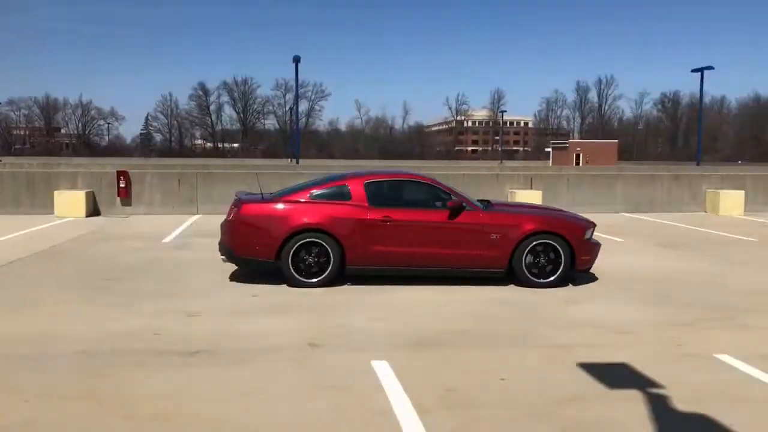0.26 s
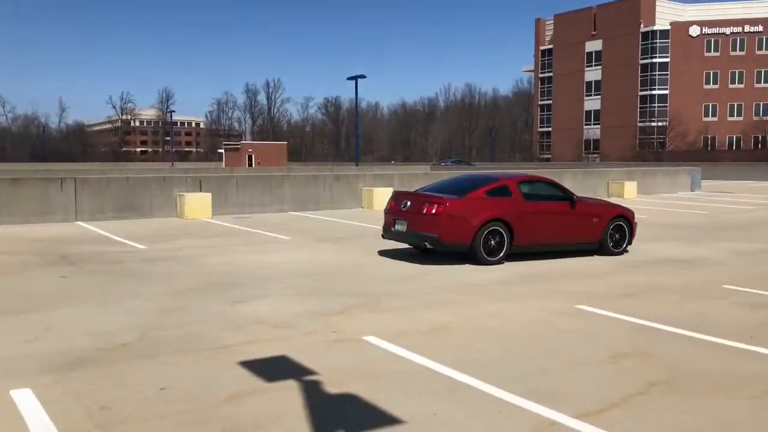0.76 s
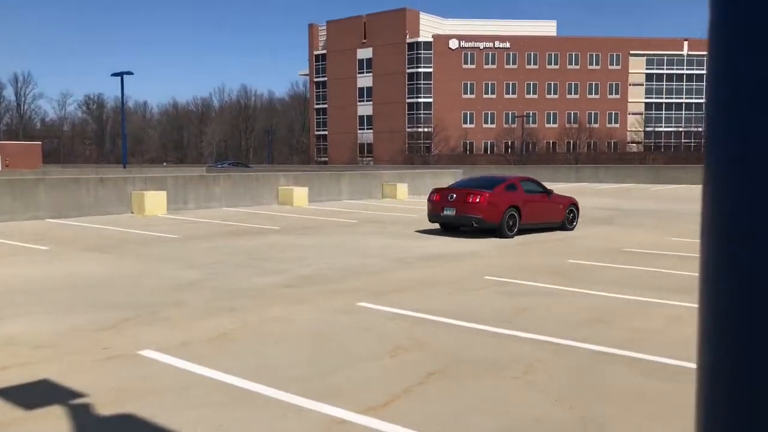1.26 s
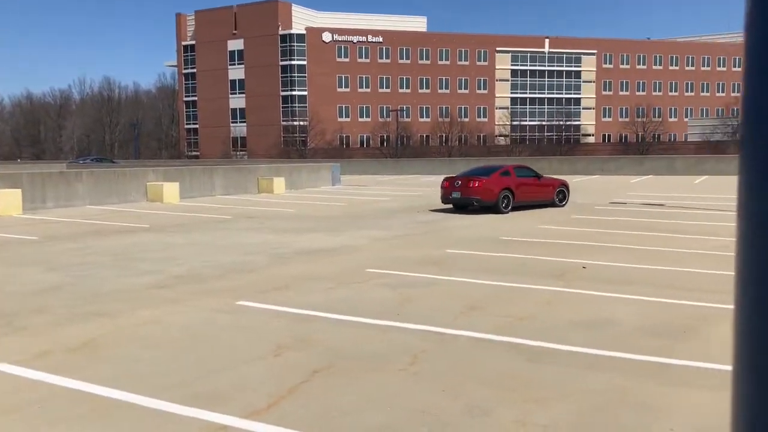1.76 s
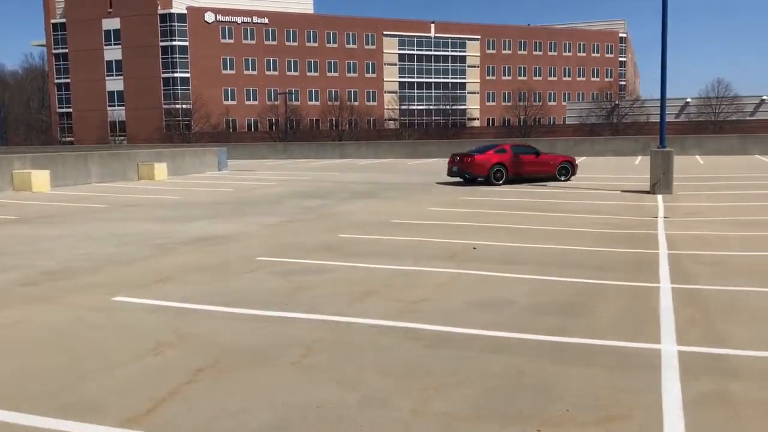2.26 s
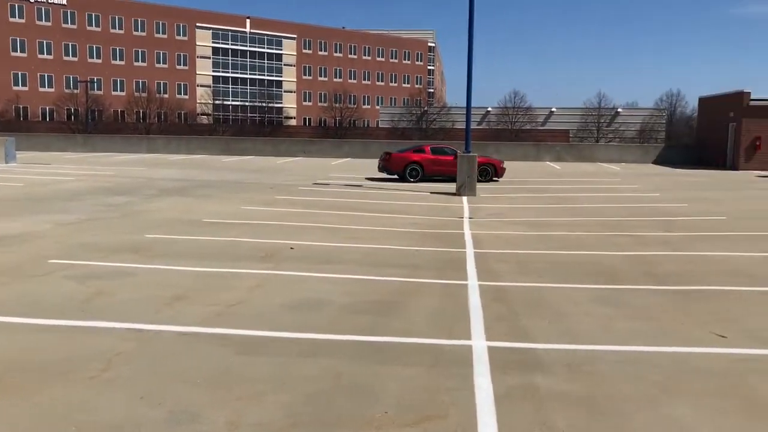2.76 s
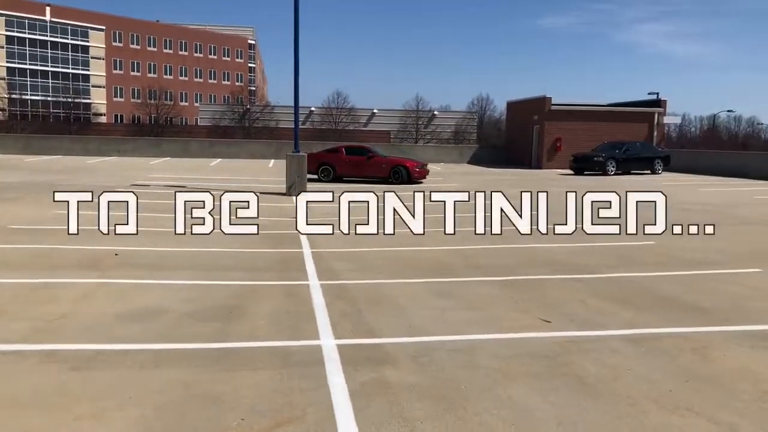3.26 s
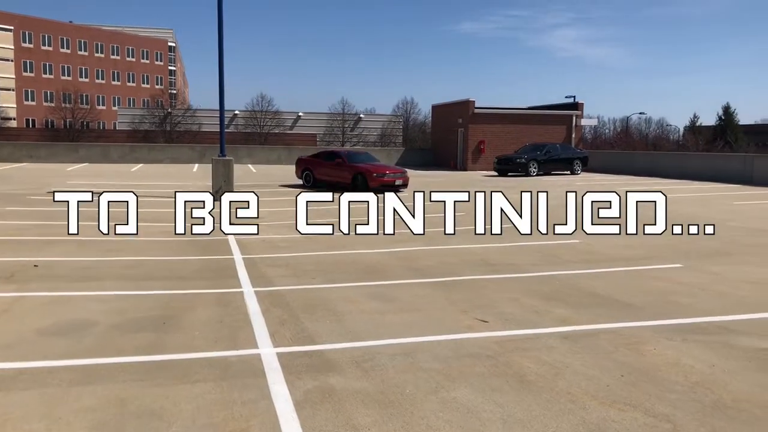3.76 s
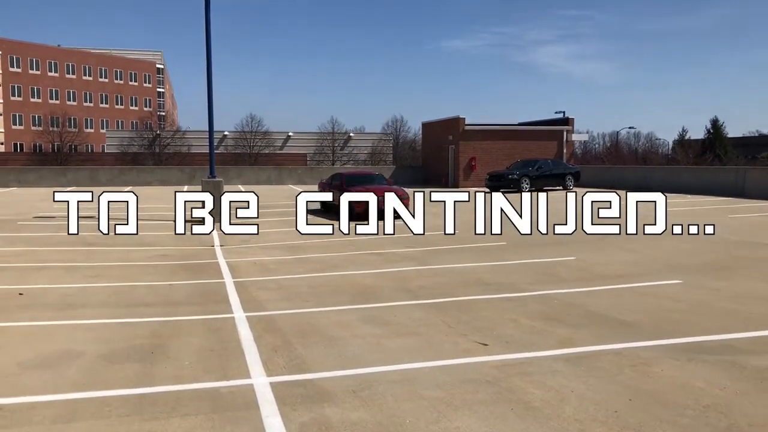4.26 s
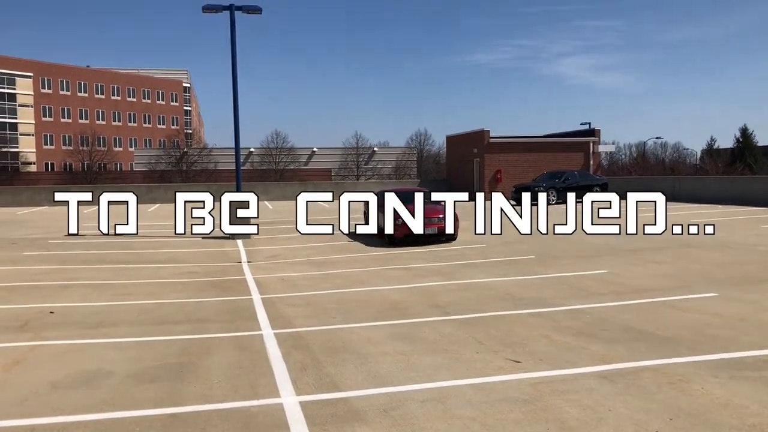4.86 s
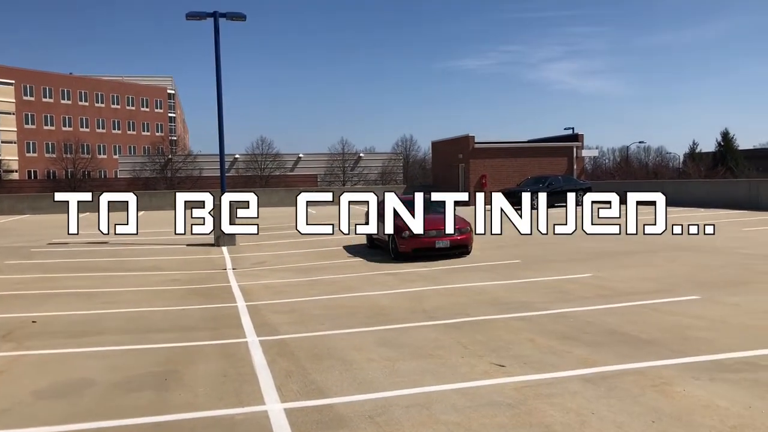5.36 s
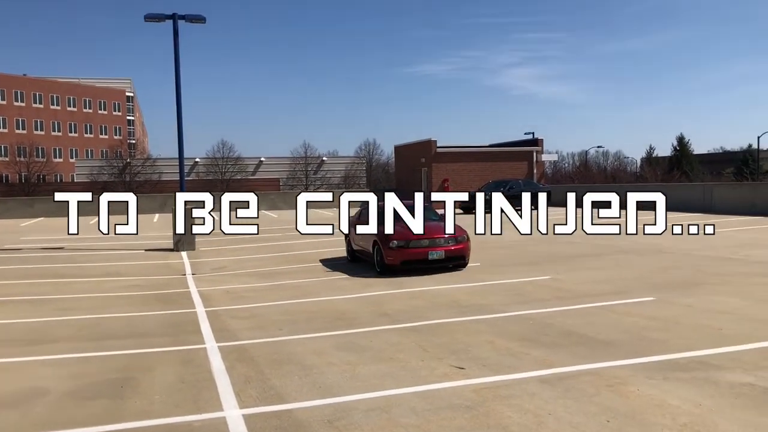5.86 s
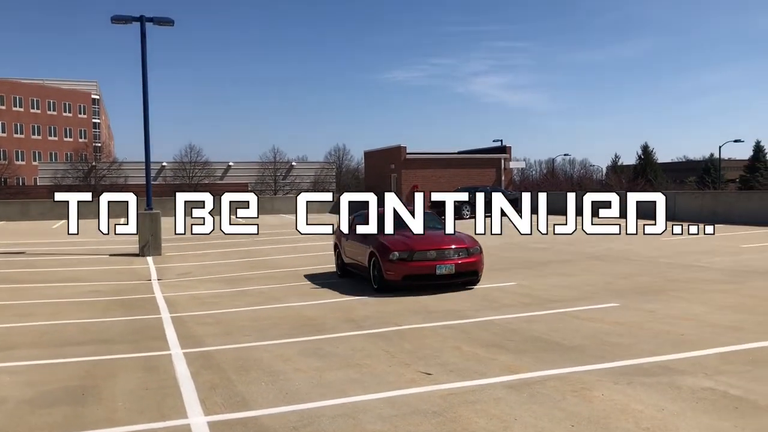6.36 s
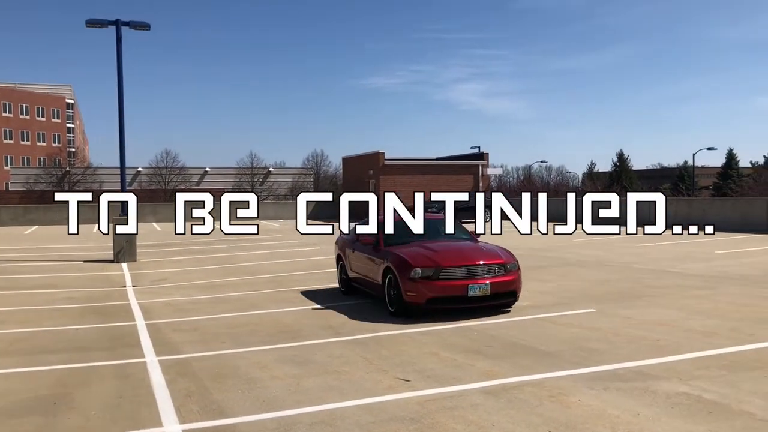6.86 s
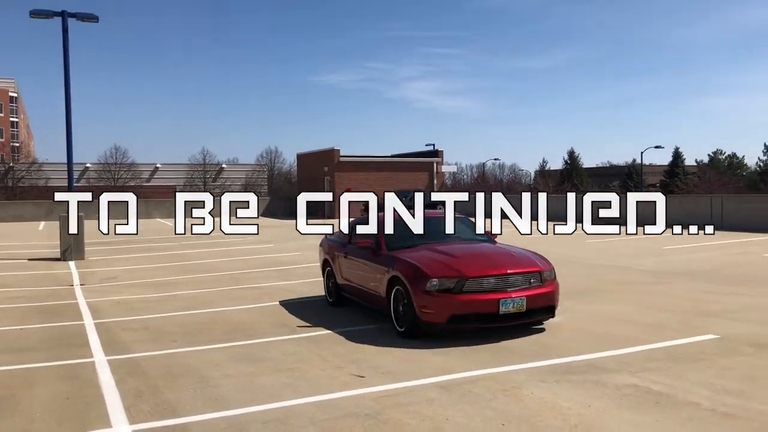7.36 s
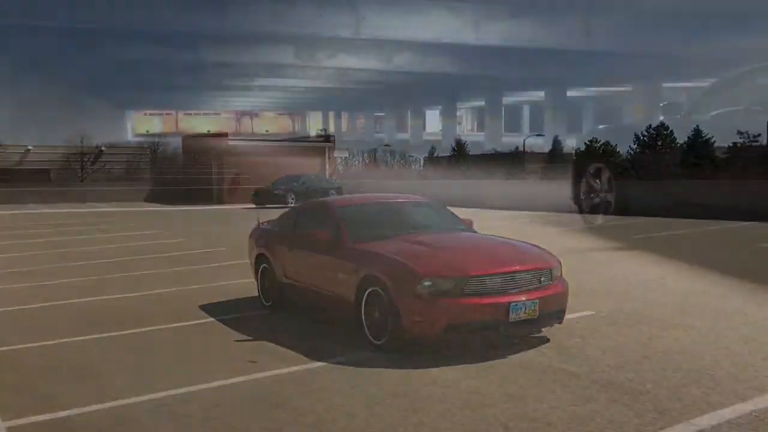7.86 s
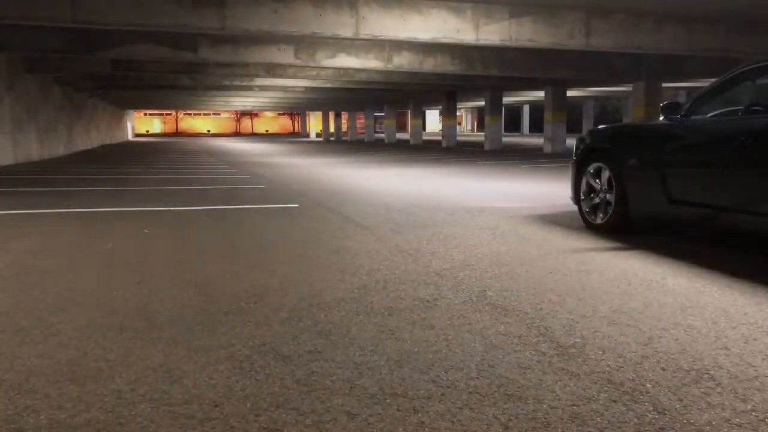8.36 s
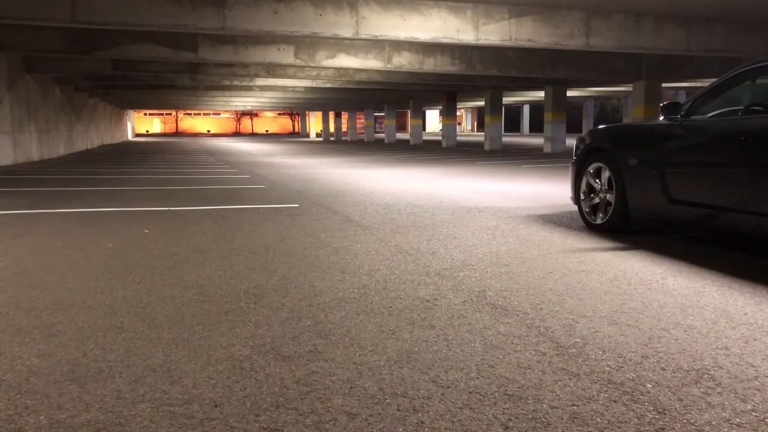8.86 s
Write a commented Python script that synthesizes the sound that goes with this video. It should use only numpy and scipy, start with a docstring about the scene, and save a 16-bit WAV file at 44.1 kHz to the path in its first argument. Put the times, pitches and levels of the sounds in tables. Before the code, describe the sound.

On an open concrete parking deck, a powerful car passes and coasts away, its exhaust tone falling into rough burbles. Tyres squeal through a bend for over two seconds, echoing off distant walls, and end in chirps. Quiet hiss, small ticks and low wind thuds on the microphone follow. Abruptly, a deep lumpy engine idle resonates in a low concrete garage.

```python
"""An eight-cylinder car coasts away across an open concrete parking deck: exhaust tones over rough firings, puffs
in the pipes. It slides round a bend on squealing tyres: tones that stick and slip, with slap echoes off the walls.
It rolls back quietly, a slowly growing hiss, while ticks sound and wind bumps the microphone as falling thuds.
At the end an engine idles in a low concrete garage: lumpy pulses ring the pipes and the room, under whine and hiss.
Roar and hiss lie under it all, louder at first."""
import sys
import numpy as np
from scipy import signal
from scipy.fft import rfft, irfft, next_fast_len
from scipy.io import wavfile
from scipy.ndimage import uniform_filter1d

SR = 44100
rng = np.random.default_rng(int(sys.argv[2]) if len(sys.argv) > 2 else 0)


def master_out(mix):
    """Clip the mix to full scale and print it as 16-bit PCM to the path in sys.argv[1]."""
    frames = np.transpose(np.atleast_2d(mix))
    ceiling = np.clip(frames, -1, 1)
    pcm = np.round(ceiling * 32767).astype(np.int16)
    wavfile.write(sys.argv[1], SR, pcm)


def elevation(decibels):
    """Turn decibel levels (scalar or array-like) into linear amplitude ratios."""
    levels = np.asarray(decibels, float)
    return 10 ** (levels / 20)


N = 401310
T = np.arange(N) / SR
GARAGE_S = 7.56  # the open deck ends, the garage begins


def unit(x):
    """Scale to rms 1."""
    return x / np.sqrt(np.mean(x ** 2))


def noise():
    """White noise of rms 1."""
    return rng.standard_normal(N)


def span(start_s, stop_s, edge_s=0.039):
    """A gate open from start to stop, with linear ramps just outside."""
    return np.clip(np.minimum(T - start_s, stop_s - T) / edge_s + 1, 0, 1)


def columns(table):
    """Each column of a curve at every sample, and a gate that is open while the curve lasts."""
    s, *cols = np.transpose(table)
    return [np.interp(T, s, c) for c in cols] + [span(s[0], s[-1])]


def walk(rate_hz):
    """Smooth random wander, about rate_hz turns a second, spread 1."""
    k = int(SR / rate_hz)
    held = np.repeat(rng.standard_normal(N // k + 1), k)
    return unit(uniform_filter1d(held, k)[:N])


def steps(rate_hz, slide_samples=60):
    """Random values held for uneven spells, about rate_hz a second, sliding from one to the next."""
    spell = np.cumsum(rng.random(N) < rate_hz / SR)
    return uniform_filter1d(noise()[spell], slide_samples)


def shaped(x, gain):
    """Filter by a gain given as a function of frequency."""
    size = next_fast_len(N)
    hz = np.arange(1, size // 2 + 2) * SR / size
    return irfft(rfft(x, size) * gain(hz), size)[:N]


def colour(points):
    """Noise of rms 1 with a spectrum drawn through (Hz, dB) points."""
    hz, db = np.transpose(points)
    return unit(shaped(noise(), lambda f: elevation(np.interp(np.log(f), np.log(hz), db))))


def resonate(x, peaks):
    """Sound through a set of steep (Hz, width in Hz, dB) resonances, scaled to rms 1."""
    def gain(f):
        return sum(elevation(db) / (1 + 1j * (f / hz - hz / f) * hz / width) ** 2 for hz, width, db in peaks)
    return unit(shaped(x, gain))


def tail(x, t60_s):
    """Diffuse reverberation: convolution with decaying noise of unit energy."""
    t = T[:int(t60_s * SR)]
    h = rng.standard_normal(len(t)) * elevation(-60 * t / t60_s)
    return signal.fftconvolve(x, h / np.sqrt(np.sum(h ** 2)))[:N]


def ground(x):
    """The bounce off the slab partly cancels a narrow band."""
    return shaped(x, lambda f: 1 - 0.54 * np.exp(-((f - 440) / 35) ** 2))


# Walls round the deck. Each row: delay in seconds, level in dB ahead of the smearing.
WALL_ECHOES = [(.065, -23), (.1, -23), (0.137, -25), (.175, -29), (.27, -31), (.4, -43.5), (.52, -41)]
DECK_T60_S, DECK_DB = 1.2, -21


def deck(x):
    """Dull, slightly smeared slap echoes from distant walls and a thin, duller diffuse tail."""
    dull = shaped(x, lambda f: .6 + 1 / (1 + (f / 1500) ** 6))
    duller = shaped(dull, lambda f: 1.2 / (1 + (f / 1900) ** 6))
    echoes = sum(elevation(db) * np.interp(T - delay_s, T, dull) for delay_s, db in WALL_ECHOES)
    return x + tail(echoes, .05) + elevation(DECK_DB) * tail(duller, DECK_T60_S)


# Faint tones. Each row: pitch in Hz, width in Hz, level in dB re HUM_DB.
HUM_TONES = [(392, 30, 0), (1310, 40, -2)]
HUM_DB = -65


def hum():
    """Narrow bands of noise that come and go under the open-air floor."""
    out = np.zeros(N)
    for peak in HUM_TONES:
        out += elevation(HUM_DB + peak[2] + 4.0 * walk(3)) * resonate(noise(), [peak])
    return out * span(0, GARAGE_S)


# Rumble, roar and hiss that are louder at first. Each row: time in seconds, level in dB ahead of layer offsets.
LOUDER_STRETCH = [(0, -32), (.5, -31), (1.16, -38.5), (1.9, -37.5), (2.5, -39), (3.5, -36.5), (4.14, -41)]
# Spectra of the three layers. Each row: frequency in Hz, relative density in dB.
RUMBLE_SPECTRUM = [(15, -22), (25, -22.5), (48, 2.5), (81, 1.5), (124, 2.5), (286, -17.5), (400, -12),
                   (520, -55.5), (880, -120)]
ROAR_SPECTRUM = [(120, -15.5), (200, 2.5), (288, -1), (392, 1.5), (449, -0.5), (857, -0.5), (1490, -4.5),
                 (2730, -23), (4310, -44), (5000, -53.5), (6500, -47), (11000, -120)]
HISS_SPECTRUM = [(1180, -8), (2000, -1.5), (2680, -9), (4060, -5.5), (5450, -14), (8260, -17.5),
                 (10100, -25.5), (15100, -29.5), (15800, -34)]
LOUDER_RUMBLE_DB, LOUDER_ROAR_DB, LOUDER_HISS_DB = -8.5, 0.5, -7.5
RUMBLE_FADE_DB_PER_S, ROAR_FADE_DB_PER_S = -3.5, -3.5  # the lower layers thin out faster than the hiss
FLOOR_RUMBLE_DB, FLOOR_ROAR_DB, FLOOR_HISS_DB = -49, -50, -61
GUST_DB = 2.2  # rms spread of the rumble's swells
GARAGE_ROAR_DB = 2  # the closed room raises the roar floor
RETURN_S, RETURN_DB_PER_S = 6.2, 1.5  # the hiss floor grows as the car rolls back
NEAR_HISS_DB, NEAR_FADE_DB_PER_S = -53.5, -10  # bright tyre hiss while the car is close


def background():
    """Gusty rumble in the open air only, flickering roar and hiss, with a louder stretch that ends over a floor."""
    db, gate = columns(LOUDER_STRETCH)
    flicker = walk(11)
    low = elevation(db + LOUDER_RUMBLE_DB + RUMBLE_FADE_DB_PER_S * T) * gate + elevation(FLOOR_RUMBLE_DB)
    rumble = low * elevation(GUST_DB * walk(7)) * colour(RUMBLE_SPECTRUM) * span(0, GARAGE_S)
    mid_floor = elevation(FLOOR_ROAR_DB + GARAGE_ROAR_DB * span(GARAGE_S, T[-1]))
    mid = elevation(db + LOUDER_ROAR_DB + ROAR_FADE_DB_PER_S * T) * gate + mid_floor
    roar = mid * elevation(.6 * flicker) * colour(ROAR_SPECTRUM)
    nearing_db = RETURN_DB_PER_S * np.clip(T - RETURN_S, 0, GARAGE_S - RETURN_S)
    high = elevation(db + LOUDER_HISS_DB) * gate + elevation(FLOOR_HISS_DB + nearing_db)
    hiss = high * elevation(1.1 * flicker + 0.6 * steps(14, 1500)) * colour(HISS_SPECTRUM)
    near = elevation(NEAR_HISS_DB + NEAR_FADE_DB_PER_S * T) * resonate(noise(), [(12000, 14000, 0)])
    return near + rumble + roar + hiss


# Small sharp ticks. Each row: start in seconds, peak in dB, centre in Hz.
TICKS = [(4.637, -56, 11500), (4.998, -49, 12500), (5.285, -42, 5500), (5.86, -34, 5160),
         (6.599, -42.5, 5500), (7.204, -45, 5000), (7.408, -45, 6000), (7.487, -40, 7000),
         (7.561, -35, 4500), (8.487, -41, 6000)]
TICK_DECAY_S = .001


def ticks():
    """Bright clicks a millisecond or two long: decaying noise, each in its own band."""
    out, t = np.zeros(N), T[:400]
    for s, db, hz in TICKS:
        burst = np.exp(-t / TICK_DECAY_S) * rng.standard_normal(400)
        edges_hz = [hz / 1.5, min(hz * 1.6, 19000)]
        band = signal.sosfilt(signal.butter(2, edges_hz, "band", fs=SR, output="sos"), burst)
        i = int(s * SR)
        out[i:i + 400] += elevation(db) * band / np.abs(band).max()
    return out


# Wind bumps. Each row: start in seconds, level in dB, nominal pitch in Hz.
BUMPS = [(4.954, -35, 130), (5.195, -36, 150), (5.322, -33, 87), (5.58, -40, 119), (6.111, -40.5, 193),
         (6.234, -33.5, 106), (6.273, -19, 189), (6.369, -32.5, 175), (6.815, -32.5, 104),
         (6.997, -37, 117), (7.248, -41, 143), (7.298, -38, 90)]
BUMP_T60_S, CHURN_T60_S, CHURN_DB = 0.12, 0.45, -16.5


def bumps():
    """Each gust: a thud that drops in pitch, a burst of turbulence and a slap that grows as the level squared."""
    out, churn = np.zeros(N), colour([(40, -1), (120, 3.0), (400, -6.5), (1200, -28), (4000, -86)])
    t = T[:SR // 2]
    rise = np.minimum(t / 0.0042, 1)
    for s, db, hz in BUMPS:
        i = int(s * SR)
        turbulence = churn[i:i + len(t)]
        pitch_hz = hz * (0.888 + 1.32 * np.exp(-t / 0.00616))
        tone = np.sin(2 * np.pi * np.cumsum(pitch_hz) / SR)
        thud = elevation(-60 * t / BUMP_T60_S) * (tone + 0.67 * turbulence)
        after = elevation(CHURN_DB - 60 * t / CHURN_T60_S) * turbulence
        slap = elevation(db + 17.5) * np.exp(-((t - .0095) / 0.0011) ** 2) * np.sin(2 * np.pi * 750 * t)
        out[i:i + len(t)] += elevation(db) * (rise * (thud + after) + slap)
    return out


# Strength of the eight pulses in firing order, in dB.
CYLINDER_DB = [-9.5, -25, -1, -16, -4.5, -2.5, -9, 1.5]


def firings(hz, jitter, scatter_db, lumpy=1):
    """One pulse a cylinder, uneven in timing and strength."""
    turn = np.floor(np.cumsum(hz * (1 + jitter * walk(40))) / SR).astype(int)
    at = np.flatnonzero(np.diff(turn))
    cylinder_db = lumpy * np.take(CYLINDER_DB, turn[at], mode="wrap")
    pulses = np.zeros(N)
    pulses[at] = elevation(cylinder_db + scatter_db * rng.standard_normal(len(at)))
    return pulses


# Pipe resonances at idle. Each row: centre in Hz, width in Hz, relative level in dB.
IDLE_PIPE = [(49, 23, -10), (61.8, 16, 9), (96.9, 34.5, 0), (117.5, 31, 6.5), (144.7, 9.9, 0.5),
             (158.5, 16, -7), (248, 13, -3.5), (281, 11, -3.5), (320.4, 11, -8), (350, 12.5, -5),
             (375, 6.9, -9), (468, 6.2, -14), (567, 28, -11), (130, 300, -13)]
# Belts and fan. Each row: centre in Hz, width in Hz, relative level in dB.
BELT_WHINE = [(2740, 380, -8), (3010, 500, -12)]
IDLE_HZ, IDLE_DB, IDLE_HISS_DB = 50, -34, -60  # firing rate; levels before the swells below
GARAGE_T60_S, GARAGE_DB = .9, -2
SURGE_DB, SURGE_S, THROB_DB = 3, 0.19, 0.9  # the idle starts strong and throbs unevenly
SWELL_S, SWELL_WIDTH_S, SWELL_DB, SWELL_HISS_DB = 8.28, .2, 2.5, 4  # the idle swells once
SETTLE_S, SETTLE_DB = .15, 2.5  # the hiss is louder at first
HISS_DROPS_S, HISS_DROP_DB = 8.565, -8


def garage():
    """Lumpy idle firings ring the pipes and fill the concrete room; belts and fan whine, with a hiss that drops."""
    swell = np.exp(-((T - SWELL_S) / SWELL_WIDTH_S) ** 2)
    surge = np.exp(-((T - GARAGE_S) / SURGE_S) ** 2)
    pipes = resonate(firings(IDLE_HZ, jitter=.05, scatter_db=2.5, lumpy=.9), IDLE_PIPE)
    room = unit(pipes + elevation(GARAGE_DB) * tail(pipes, GARAGE_T60_S))
    whine = elevation(-28.0 + 0.45 * walk(13.0) + 3.5 * walk(60)) * resonate(noise(), BELT_WHINE)
    engine_db = IDLE_DB + SURGE_DB * surge + SWELL_DB * swell + THROB_DB * walk(22)
    first_db = SETTLE_DB * np.exp(-np.abs(T - GARAGE_S) / SETTLE_S)
    hiss_db = IDLE_HISS_DB + first_db + SWELL_HISS_DB * swell + HISS_DROP_DB * span(HISS_DROPS_S, T[-1])
    hiss = elevation(hiss_db) * resonate(noise(), [(5550, 8200, -1.5), (13100, 9000, -15.0)])
    return span(GARAGE_S, T[-1], .004) * (elevation(engine_db) * (room + whine) + hiss)


# Exhaust burps off throttle. Each row: centre in seconds, level in dB, pitch in Hz.
BURPS = [(.74, -30.5, 360), (0.871, -28, 307), (.93, -30, 245), (1.0, -29.5, 383), (1.06, -31, 302),
         (1.239, -29, 170), (1.38, -30, 130), (1.65, -30, 90), (1.841, -35, 102), (1.91, -38.5, 169.4),
         (2.01, -32.5, 350), (2.09, -32, 170), (2.19, -32, 130)]
BURP_CYCLES, BURP_SHORTEST_S = 4.84, 0.022  # twice the envelope width; least envelope width


def burps():
    """Late burning in the pipes: soft rough puffs of a few cycles."""
    out, rasp = np.zeros(N), walk(250)
    for s, db, hz in BURPS:
        width_s = max(BURP_CYCLES / hz / 2, BURP_SHORTEST_S)
        puff = elevation(db + 2.5 * rasp) * np.exp(-((T - s) / width_s) ** 2)
        out += puff * np.sin(2 * np.pi * hz * (T - s) + 0.86 * rasp[::-1])
    return out


# Engine slowing off throttle. Each row: time in seconds, firing rate in Hz.
COAST = [(0, 258.5), (.85, 203.2), (1.6, 125.9), (2.4, 94.7)]
# Exhaust tones. Each row: multiple of the firing rate, level in dB re the tone level.
EXHAUST_ORDERS = [(0.377, -16), (0.629, -12), (0.749, -7), (0.999, 3.5), (1.374, -9), (2.0, -23),
                  (2.749, -19.5)]
# Pipe resonances. Each row: centre in Hz, width in Hz, relative level in dB.
EXHAUST_PIPE = [(84, 37, 2), (167, 154, 9.5), (369.6, 26, 7), (588, 164, 4)]
TONE_DB, TURNS_AWAY_S, TONE_FADE_DB_PER_S2 = -28.5, 0.42, -75  # tones die once the tailpipes point elsewhere
BURBLE_DB, BURBLE_SWELL_S, BURBLE_RISE_DB_PER_S, BURBLE_FADE_DB_PER_S = -38.5, 0.8, 34, -11
BURBLE_SCATTER_DB = 3.5


def coasting():
    """Clean exhaust tones that fade as the car turns away, over rough firings in the pipes."""
    hz, gate = columns(COAST)
    phase = 2 * np.pi * np.cumsum(hz) / SR
    tones = sum(elevation(db + 1.2 * walk(6)) * np.sin(k * phase + 9 * k * k) for k, db in EXHAUST_ORDERS)
    tone_db = TONE_DB + TONE_FADE_DB_PER_S2 * np.maximum(T - TURNS_AWAY_S, 0) ** 2
    rough = resonate(firings(hz, jitter=.2, scatter_db=BURBLE_SCATTER_DB) * gate, EXHAUST_PIPE)
    late_s = T - BURBLE_SWELL_S
    rough_db = BURBLE_DB + np.where(late_s < 0, BURBLE_RISE_DB_PER_S, BURBLE_FADE_DB_PER_S) * late_s
    return gate * (elevation(tone_db) * tones + elevation(rough_db) * rough)


# A whole tyre skips sideways. Each row: start in seconds, length in seconds, level in dB.
RASPS = [(1.62, .05, -40), (1.793, 0.095, -43.5), (2.70, 0.14, -45.5), (2.99, 0.099, -44.5),
         (3.437, 0.14, -45.5), (4.089, 0.066, -47)]


def rasps():
    """Bursts of bright grit from the tread: gated noise, roughly modulated."""
    level = sum(elevation(db) * span(s, s + length_s, 0.014) for s, length_s, db in RASPS)
    return level * elevation(2.1 * walk(150)) * resonate(noise(), [(3330, 2400, 4.5), (10000, 15000, -17.5)])


# Shape of the harmonics of a slipping tread block, fundamental first, in dB ahead of their steady fall.
RUBBER_DB = [0, 0, 1, -3]


def slip(hz, overtone_db):
    """A tread block sticking and slipping: a tone whose overtones each fall by overtone_db, at least 9 dB."""
    turn = np.exp(2j * np.pi * np.cumsum(hz) / SR)
    fall = elevation(np.minimum(overtone_db, -9))
    return (turn * np.polyval(elevation(np.array(RUBBER_DB[::-1])), fall * turn)).imag


# Last chirps as the tread bites. Each row: start in seconds, level in dB, pitch in Hz, attack in seconds,
# length in seconds, overtone fall in dB.
BITES = [(4.060, -7, 1745, .004, .032, -21), (4.093, -25, 1560, .003, .02, -45),
         (4.111, -1.5, 1412, .018, .041, -33)]
BITE_SETTLE = .09  # share of the pitch


def bites():
    """Short chirps that drop onto their pitch, flutter and break off."""
    out, throb, waver = np.zeros(N), walk(170), walk(500)
    for s, db, hz, attack_s, length_s, overtone_db in BITES:
        at = np.arange(int(s * SR), int((s + length_s) * SR))
        t = T[:len(at)]
        break_off = np.sqrt(np.clip(1 - (t / length_s) ** 4, 0, 1))
        swell = np.minimum(t / attack_s, 1) * break_off * np.exp(-t / .04)
        pitch_hz = hz * (1 + BITE_SETTLE * np.exp(-t / .003) + .016 * waver[at])
        fall_db = overtone_db + 8 * np.exp(-t / .012) + 3 * waver[-at]
        out[at] += elevation(db + 1.4 * throb[at]) * swell * slip(pitch_hz, fall_db)
    return out


# Tread that catches on one pitch. Each row: start in seconds, level in dB, pitch in Hz, length in seconds,
# overtone fall in dB.
SHRIEKS = [(1.607, -23.5, 1349, 0.071, -19), (1.71, -26.5, 1264, 0.1, -18.5),
           (1.64, -30.5, 1583, 0.044, -13), (1.785, -28, 1534, 0.14, -11.5),
           (1.885, -21, 1300, 0.088, -13.5), (2.01, -26, 1321, 0.088, -9), (2.47, -16.5, 1188, 0.169, -21),
           (2.71, -11.5, 1202, 0.1, -23.5), (2.78, -26.5, 1628, 0.12, -24), (3.06, -17, 1190, .22, -18),
           (3.14, -21.5, 1688, 0.088, -23), (3.19, -15, 1547, 0.12, -19.5), (3.35, -19.5, 1740, 0.091, -27),
           (3.437, -15, 1785, 0.054, -29), (3.49, -16, 1690, 0.053, -25), (3.58, -19, 1375, 0.11, -17.5)]
ATTACK_S, FALL_SHARE = 0.0022, 0.28  # the fall is a share of the length
SETTLE, FRAY_PER_S = 0.0196, 0.117  # shares of the pitch; longer shrieks fray more
CLEAN_HZ, ROUGH_HZ = 1400, 1750  # least rough near and below the first pitch, fully rough at the second
STRAY_DB, STRAY_SPREAD = -7, .07  # a second block joins rough shrieks, off pitch


def shrieks():
    """Short rough squeals of stick-slip tread, settling in pitch."""
    out, waver, jumps, throb, edge = np.zeros(N), walk(500), steps(40), walk(150), walk(120)
    for k, (s, db, hz, length_s, overtone_db) in enumerate(SHRIEKS):
        at = np.arange(int(s * SR), int((s + length_s) * SR))
        own = (at + 9000 * k) % N  # its own stretch of each wander
        u = np.linspace(0, 1, len(at))
        rough = np.clip((hz - CLEAN_HZ) / (ROUGH_HZ - CLEAN_HZ), .15, 1)
        wobble = (0.013 + 0.026 * rough) * waver[own] + FRAY_PER_S * length_s * jumps[own]
        pitch_hz = hz * (1 + SETTLE * (1 - u) ** 4 + wobble)
        main = slip(pitch_hz, overtone_db + 3.6 * edge[own])
        stray_hz = pitch_hz * (1 + STRAY_SPREAD * jumps[-own])
        stray = slip(stray_hz, overtone_db + 3.4 * edge[-own])
        stray = rough * elevation(STRAY_DB + 5.6 * throb[-own]) * stray
        swell = np.minimum(np.minimum(u * length_s / ATTACK_S, (1 - u) / FALL_SHARE), 1)
        out[at] += elevation(db + 2.84 * throb[own]) * swell * (main + stray)
    return out


# Side load on the tyres through the bend. Each row: time in seconds, level in dB.
SIDE_LOAD = [(1.62, -36), (1.8, -28), (1.92, -22), (2.6, -22.5), (3.05, -23), (3.45, -23.5), (3.8, -26.5),
             (4.0, -32), (4.05, -27)]
# Rubber grinding on concrete. Each row: frequency in Hz, relative density in dB.
SCRUB_SPECTRUM = [(500, -48), (900, -5), (1300, 1.5), (2300, -10), (3500, -14.5), (5000, -25.5),
                  (8000, -57.5)]
# Sliding tyres. Each row: start in seconds, slip pitch in Hz, sag in Hz per second, level in dB re the load,
# overtone fall in dB.
TYRES = [(1.62, 1358, 60, -0.5, -14.5), (1.62, 1470, -13, -11, -26), (2.2, 1156, 18, -4.5, -10)]
JOIN_S = 0.4  # a later tyre takes this long to break loose fully
FRAY_START, FRAY_END = .04, .1  # pitch scatter among tread blocks, growing through the slide
GRIP_S, GRIP_RISE_PER_S = 3.88, 1.5  # pitch climbs as the tyres regain grip
DULLS_S, DULLS_DB_PER_S = 3.6, -30  # overtones die as the slide ends


def tyre(start_s, hz, sag_hz_per_s, db, overtone_db):
    """Four tread blocks, each holding a pitch, letting go and catching at another; grinding noise under them."""
    load_db, gate = columns(SIDE_LOAD)
    first_s, last_s = SIDE_LOAD[0][0], SIDE_LOAD[-1][0]
    scatter = np.interp(T, [first_s, last_s], [FRAY_START, FRAY_END])
    grip = 1 + GRIP_RISE_PER_S * np.clip(T - GRIP_S, 0, .18)
    centre_hz = (hz - sag_hz_per_s * (T - start_s)) * grip
    dull_db = DULLS_DB_PER_S * np.maximum(T - DULLS_S, 0)
    blocks = np.zeros(N)
    for _ in range(4):
        pitch_hz = centre_hz * (1 + scatter * steps(35, 250) + .012 * walk(25) + .024 * walk(300))
        level = elevation(2.6 * walk(90) + 2.0 * steps(15))
        blocks += level * slip(pitch_hz, overtone_db + 2.5 * walk(40) + dull_db)
    loose = np.clip((T - start_s) / JOIN_S, 0, 1) if start_s > first_s else 1
    return elevation(load_db + db) * gate * loose * (unit(blocks) + elevation(-11.0) * colour(SCRUB_SPECTRUM))


def scene():
    """Car and its echoes, air, small noises at the microphone, then the garage."""
    squeal = sum(tyre(*row) for row in TYRES) + shrieks() + bites() + rasps()
    grounded = ground(coasting() + burps() + background())
    return (grounded + deck(squeal) + hum() + bumps() + ticks() + garage())[None]


def roll_off(x):
    """The treble ends steeply here."""
    return signal.sosfilt(signal.butter(12, 15830, fs=SR, output="sos"), x)


def record(dry):
    """A small microphone that cuts the deepest bass."""
    mix = signal.sosfilt(signal.butter(4, 38, "high", fs=SR, output="sos"), dry)
    return roll_off(mix)


dry = scene()
out = record(dry)
master_out(out)
```